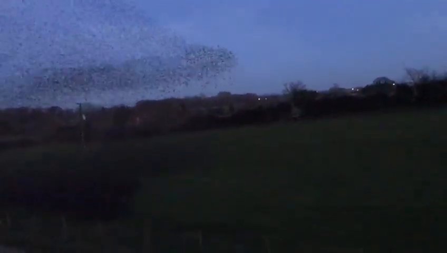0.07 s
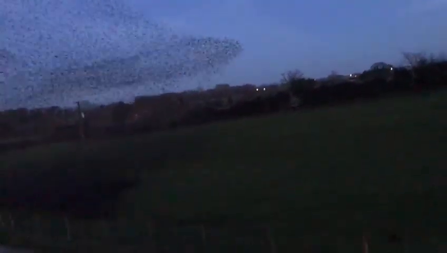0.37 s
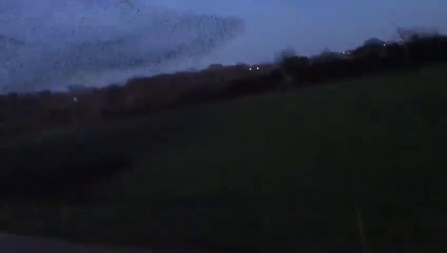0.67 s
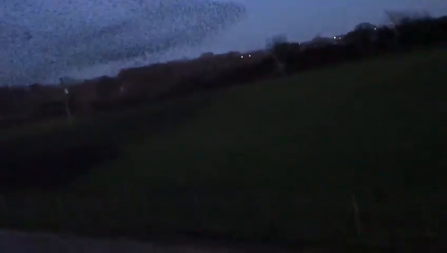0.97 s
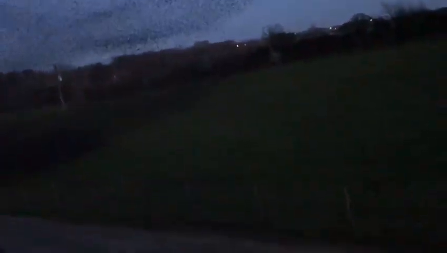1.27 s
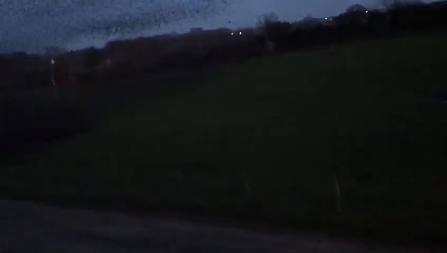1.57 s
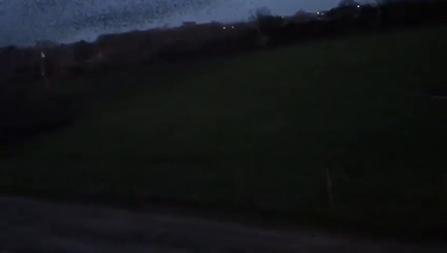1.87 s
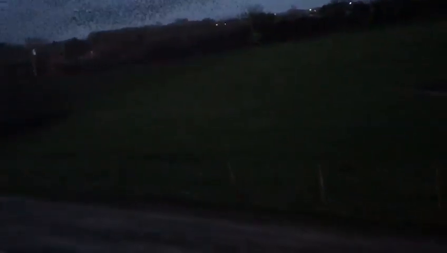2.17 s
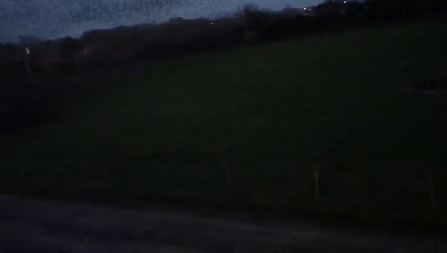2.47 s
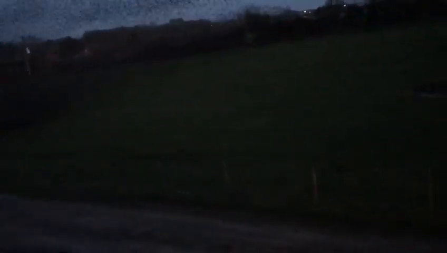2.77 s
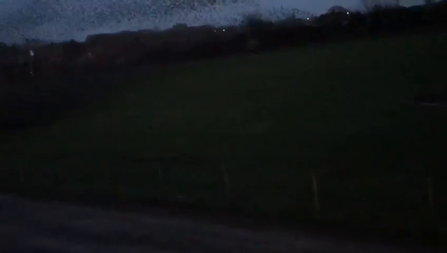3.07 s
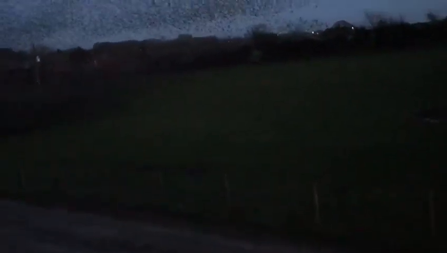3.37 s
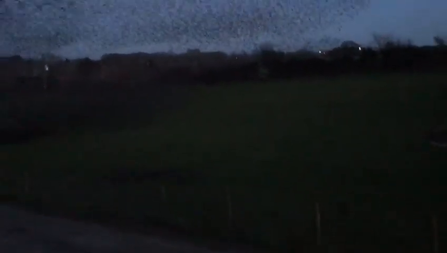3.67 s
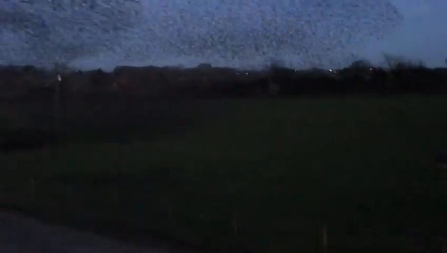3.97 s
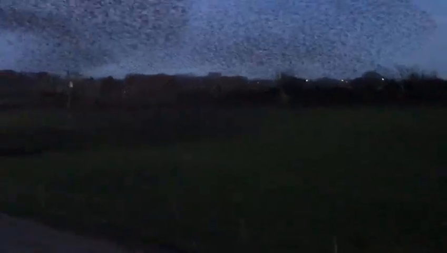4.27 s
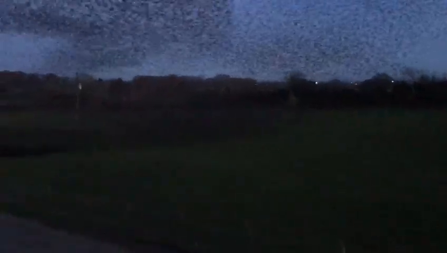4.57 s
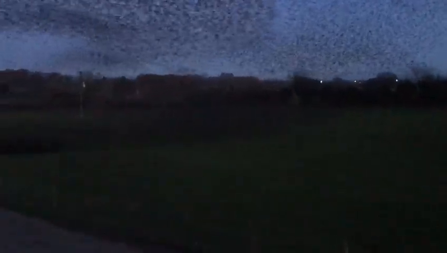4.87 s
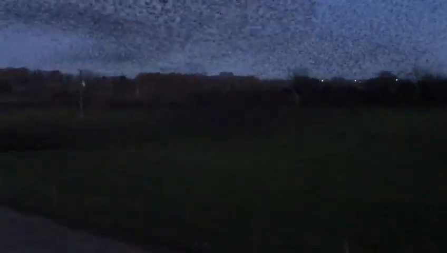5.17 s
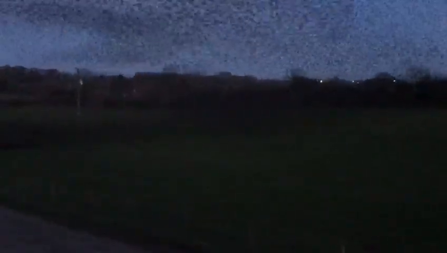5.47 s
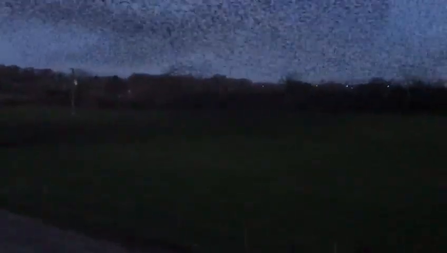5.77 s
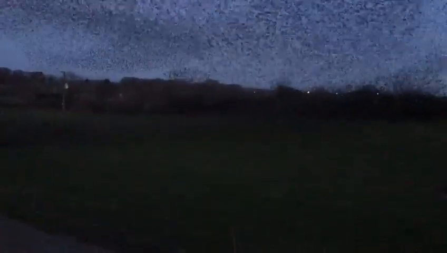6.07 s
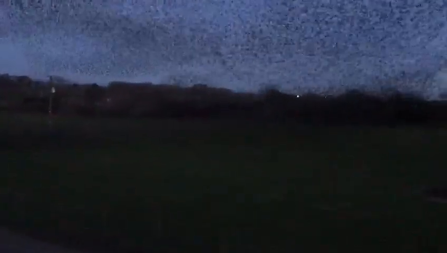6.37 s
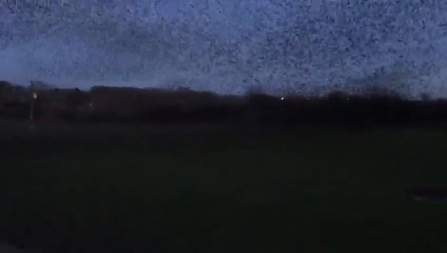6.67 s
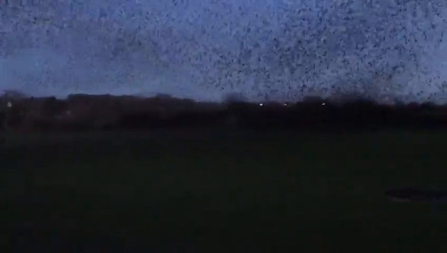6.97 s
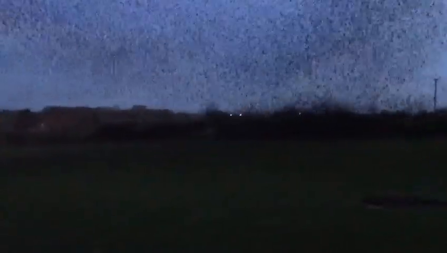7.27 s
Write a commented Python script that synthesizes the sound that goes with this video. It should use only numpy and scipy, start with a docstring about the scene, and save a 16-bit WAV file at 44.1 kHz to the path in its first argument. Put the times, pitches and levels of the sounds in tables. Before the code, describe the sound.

Thousands of starlings wheel over a field at dusk, their wingbeats merging into a soft, continuous rush. Gusts rumble and thump on the hand-held microphone, and clothing ticks and swishes briefly at the start. Midway the flock's whoosh swells as it turns, and a few thin, faint bird calls come from far off. Near the end the wind drops and the rush of wings carries on.

```python
"""From the start, thousands of wingbeats merge into a soft rush as starlings wheel over a field at dusk,
while gusts rumble on the hand-held microphone and single eddies thump across its port. In the first
second clothing ticks and a sleeve swishes. Near 3 s the flock banks and its whoosh swells; from then to
just past 4 s, thin bird calls come from far off. The hardest thumps fall near 3.8 s and 5.4 s.
After 6 s the wind drops, apart from one weak gust, and the rush of wings carries on."""
import sys
import numpy as np
from scipy import signal
from scipy.fft import rfft, irfft, next_fast_len
from scipy.io import wavfile
from scipy.ndimage import uniform_filter1d, map_coordinates

SR = 44100
rng = np.random.default_rng(int(sys.argv[2]) if len(sys.argv) > 2 else 0)


def waveform_to_disk(signal):
    """Save audio, clipped to [-1, 1], as 16-bit WAV at the path in sys.argv[1]."""
    frames = np.transpose(np.atleast_2d(signal))
    scaled = np.clip(frames, -1, 1) * 32767
    samples = np.round(scaled).astype(np.int16)
    wavfile.write(sys.argv[1], SR, samples)


N = 332073

# Spectra of pushed air, the turning flock and feathers: (frequency [Hz], relative density [dB])
RUSH_SPECTRUM = [(50, 15), (85, 16), (200, 4.5), (420, -3.5), (620, -1), (820, -4), (1080, -0.5),
                 (1350, -4), (1600, -3), (1950, -7.5), (2800, -9), (4000, -19), (8000, -43)]
WHOOSH_SPECTRUM = [(1200, -39), (1900, -5), (2350, 3.5), (2650, 2.5), (3000, -2.5), (3500, -14),
                   (5000, -66)]
FEATHER_SPECTRUM = [(1500, -33), (3000, 2.5), (4000, 4), (4900, 0.5), (5700, 0.5), (6500, 0), (7500, -4.5),
                    (9000, -5), (10400, -9), (11500, -11.5)]
# The flock drifts nearer and farther: (time [s], relative rush level [dB], relative hiss level [dB])
FLOCK_LEVELS = [(0, -52, -58.0), (0.35, -48.5, -56.5), (1.0, -50.5, -58), (1.3, -54.5, -61),
                (2.5, -54.5, -61.5), (3.3, -54, -60), (3.8, -51, -55.5), (4.25, -52.5, -59.0),
                (4.85, -50.0, -56.0), (5.55, -54.0, -62), (5.88, -52.0, -57.5), (6.1, -53.0, -60.5),
                (6.5, -51.0, -58.0), (7.15, -53, -59), (7.5, -51.5, -55)]
# The whoosh swells as the flock banks: (peak time [s], rise [s], fall [s], relative level [dB])
FLOCK_TURNS = [(.35, 0.29, .3, -65), (1.45, .33, 0.36, -57.5), (2.98, 0.87, 0.44, -50.5)]
def flock(rush_db=9.5, level_flight_db=-5.5, turn_db=0.5, feather_db=4.5):
    """Incoherent summation: countless wings add up to noise, heard as rush, whoosh and feather hiss."""
    near_db, hiss_db = curve(FLOCK_LEVELS, column=1), curve(FLOCK_LEVELS, column=2)
    rush = noise(RUSH_SPECTRUM) * wingbeats(depth=0.041) * undb(near_db + rush_db)
    whoosh_gain = np.hypot(undb(near_db + level_flight_db), undb(turn_db) * swells(FLOCK_TURNS))
    whoosh = noise(WHOOSH_SPECTRUM) * wingbeats(depth=0.07) * whoosh_gain
    feathers = noise(FEATHER_SPECTRUM) * wingbeats(depth=0.053) * undb(hiss_db + feather_db)
    return rush + whoosh + feathers


def wingbeats(depth, beat_hz=11.0, flap_s=0.89, birds=40):
    """Amplitude modulation: each near bird flaps at its own rate for a moment, then glides."""
    t = np.arange(0, N, 64) / SR
    when, pace, phase = rng.random((birds, 3)).T[:, :, None]
    strokes = np.cos(2 * np.pi * (beat_hz * (.75 + pace / 2) * t + phase))
    flapping = np.exp(-((t - when * t[-1]) / flap_s) ** 2)
    flutter = np.sum(strokes * flapping, axis=0)
    return np.exp(depth * np.interp(np.arange(N) / SR, t, flutter / flutter.std()))


# Response of the hollow in front of the microphone: (frequency [Hz], gain [dB])
PORT_RESPONSE = [(15, -3), (45, 2), (90, 2), (380, -1.5), (520, -3), (740, 3.5), (1000, 2.5), (1350, 4.5),
                 (2500, 3)]
def buffets():
    """Cavity resonance: the hollow at the microphone colours the wind's rumble and thumps."""
    wind_db = wind()
    return colour(rumble(wind_db) + eddies(wind_db), PORT_RESPONSE)


# Breeze between gusts: (time [s], relative level [dB])
BREEZE_LEVELS = [(0, -36), (1.0, -31.5), (1.3, -29), (2.0, -32.5), (2.75, -35), (2.92, -49), (3.2, -33),
                 (4.0, -32), (4.9, -34.5), (5.22, -39), (5.63, -29.5), (5.72, -40), (6.1, -37.5),
                 (6.3, -53), (6.9, -55), (7.53, -48)]
# Gusts on the microphone: (start [s], duration [s], relative level [dB])
WIND_GUSTS = [(.02, 0.036, -19.5), (0.162, 0.21, -30), (0.436, 0.096, -24), (0.581, 0.029, -19),
              (.7, 0.071, -23.5), (0.991, 0.053, -20.5), (1.088, 0.2, -17.5), (1.379, 0.065, -17),
              (1.492, 0.065, -16), (1.601, 0.072, -19), (1.776, .19, -16.5), (2.102, 0.077, -24),
              (2.248, 0.1389, -25), (2.491, 0.12, -26.5), (2.683, 0.031, -25.5), (2.777, 0.038, -30.5),
              (2.961, 0.047, -33), (3.206, 0.1248, -24), (3.418, 0.076, -17.5), (3.535, 0.042, -18),
              (3.66, 0.058, -21.5), (3.762, 0.13, -17.5), (4.048, 0.03, -18), (4.16, 0.031, -15.5),
              (4.217, .11, -20.5), (4.388, 0.04, -23.5), (4.479, 0.13, -22), (4.665, 0.039, -24),
              (4.752, 0.052, -15), (4.898, 0.1104, -16.5), (5.087, 0.037, -24.5), (5.296, 0.19, -17.5),
              (5.537, 0.073, -16.5), (5.774, .1, -27.5), (5.986, 0.084, -21), (6.982, 0.11, -29)]
def wind(gain_db=0.5, attack_s=.008, release_s=.013):
    """Addition of powers: the breeze and the brief gusts sum to one wind strength, in dB."""
    t = np.arange(N) / SR
    power = undb(curve(BREEZE_LEVELS)) ** 2
    for start, length, db in WIND_GUSTS:
        fade = np.maximum(start - t, 0) / attack_s + np.maximum(t - start - length, 0) / release_s
        power += (undb(db) * np.exp(-np.minimum(fade, 20))) ** 2
    return 10 * np.log10(power) + gain_db


# Turbulent pressure in a medium gust: (frequency [Hz], relative density [dB])
RUMBLE_SPECTRUM = [(20, -26), (30, -22), (42, 5.5), (55, 6.5), (75, 2.5), (110, -3.5), (180, -12.5),
                   (300, -27), (500, -36.5), (900, -68), (2000, -96)]
def rumble(wind_db, gain_db=-2.5, medium_db=-27, quicken=.15, churn_db=3.0, breakup=0.18):
    """Frozen turbulence: a pressure field swept past the port sounds louder and higher in faster air."""
    gust_db = wind_db + churn_db * walk(50)
    speed = np.clip(undb(quicken * (gust_db - medium_db)), .9, 1.15)
    field = noise(RUMBLE_SPECTRUM, size=2 * N)
    # the gust sets the strength, so the field's own slow swells are evened out
    field /= np.sqrt(uniform_filter1d(field ** 2, int(0.0507 * SR)))
    # strong gusts break up into single eddies and leave less even rumble
    gust_db -= breakup * np.maximum(gust_db - medium_db, 0)
    return map_coordinates(field, [np.cumsum(speed)], order=3) * undb(gust_db + gain_db)


# The hardest eddies: (time [s], relative peak level [dB], centre frequency [Hz])
HARD_EDDIES = [(0.031, -12, 165), (0.446, -9, 152), (0.495, -9.5, 192), (0.585, -6.5, 172),
               (.707, -16, 151), (.907, -15.5, 161), (1.0, -12.5, 135), (1.018, -8, 130),
               (1.154, -8.5, 176.2), (1.216, -7, 205.4), (1.235, -13, 160), (1.274, -9, 175),
               (1.389, -10.5, 222), (1.516, -13, 145), (1.605, -6.5, 129.5), (1.645, -11.5, 186),
               (1.782, -7, 204.8), (1.858, -13, 134.6), (1.9, -4.5, 119), (1.943, -9, 144.6),
               (1.983, -10.5, 125), (2.13, -6, 215), (2.585, -11.5, 197.9), (3.312, -11.5, 130.2),
               (3.435, -14, 130.4), (3.478, -3.5, 182), (3.56, -9, 89.93), (3.662, -7, 144),
               (3.691, -12, 239.2), (3.764, -6.5, 145.4), (3.78, -3, 207.1), (3.798, -10.5, 208.5),
               (3.814, -4, 147.5), (3.835, 0, 169), (3.856, -4, 208), (3.891, -9.5, 191.8),
               (4.06, -9, 123.4), (4.169, -5, 145), (4.259, -12.5, 151.5), (4.312, -4.5, 116),
               (4.758, -4.5, 161), (4.953, -4, 162), (4.974, -6, 170.9), (5.311, -12, 102.4),
               (5.376, 0, 202.3), (5.414, -5, 162), (5.457, -5.5, 222.9), (5.475, -8, 174.1),
               (5.508, -6.5, 317), (5.546, -2, 390), (5.553, -5.5, 240), (5.988, -10.5, 184.6),
               (6.053, -7.5, 110.2)]
def eddies(wind_db, gain_db=-2.0, wake_db=-8, wake_ratio=0.4, shed_db=-13, shed_ratio=1.13,
           trail_s=0.01284):
    """Vortex shedding: each eddy thumps across the port, trailed by a slow wake and two weaker eddies."""
    out, t = np.zeros(N), np.arange(-2048, 2048) / SR
    for time, db, hz in HARD_EDDIES + lesser_eddies(wind_db):
        eddy_side, wake_side, _ = rng.random(3)
        thump = vortex(t, hz, eddy_side)
        thump += undb(wake_db) * vortex(t - trail_s / 2, hz * wake_ratio, wake_side)
        for side, lag, pitch in rng.random((2, 3)):
            shed_hz = hz * shed_ratio * 2 ** (pitch - .5)
            thump += undb(shed_db) * vortex(t - trail_s * lag, shed_hz, side)
        add(out, time + t[0], undb(db + gain_db) * thump)
    return out


def lesser_eddies(wind_db, per_s=35, usual_hz=120.5, usual_db=-21, octaves_per_db=0.06,
                  over_wind_db=2.5, scatter_db=1.5, scatter_octaves=0.19):
    """Convection: stronger wind sweeps random eddies past harder and faster; rows as in HARD_EDDIES."""
    count = int(per_s * N / SR)
    at = ((np.arange(count) + rng.random(count)) * N / count).astype(int)
    strength, pitch = rng.standard_normal((count, 2)).T
    db = wind_db[at] + over_wind_db + scatter_db * strength
    hz = usual_hz * 2 ** (scatter_octaves * pitch + octaves_per_db * (wind_db[at] - usual_db))
    return list(zip(at / SR, db, hz))


def vortex(t, hz, side):
    """Pressure pulse of a vortex: one smooth swing, shaped by the side on which it passes."""
    return np.real(np.exp(2j * np.pi * side) / (1 - 1j * np.pi * hz * t) ** 3)


# Sliding nylon: (frequency [Hz], relative density [dB])
NYLON_SPECTRUM = [(1200, -3), (2300, -2), (4200, 0), (5000, -2), (7000, -0.5), (9000, 1), (11800, -2.5)]
# Rubs that make up one swish: (peak time [s], rise [s], fall [s], relative level [dB])
SLEEVE_RUBS = [(.537, 0.037, 0.019, -45.5), (.587, 0.022, 0.016, -45.5), (.702, 0.076, 0.034, -41)]
def sleeve(grain_db=1.2, weave_hz=6100, weave_db=-4):
    """Sliding friction: nylon gives a grainy hiss, and its weave sings only when it slides fast."""
    stroke = swells(SLEEVE_RUBS)
    weave_band = [(0.68 * weave_hz, -25), (weave_hz, 0), (1.24 * weave_hz, -25), (2 * weave_hz, -50)]
    weave = undb(weave_db) * noise(weave_band) * stroke / stroke.max()
    return (noise(NYLON_SPECTRUM) + weave) * stroke * undb(grain_db * walk(220))


# Ticks of clothing: (time [s], peak level [dB], centre frequency [Hz])
CREASE_TICKS = [(0.315, -32, 3000), (.428, -42, 9500), (.441, -37.5, 10500), (1.374, -43.5, 9930),
                (3.844, -34.5, 5612)]
def creases(decay_s=0.002):
    """Impulsive excitation: a crease snaps and gives a burst of noise that decays exponentially."""
    out, t = np.zeros(N), np.arange(512) / SR
    for time, db, hz in CREASE_TICKS:
        band = [(hz / 2, -14), (hz, 0), (2 * hz, -14), (4 * hz, -30)]
        snap = noise(band, size=len(t)) * np.exp(-t / decay_s)
        add(out, time, undb(db) * snap / abs(snap).max())
    return out


# Far calls: (time [s], duration [s], start frequency [Hz], end frequency [Hz], relative level [dB])
BIRD_CALLS = [(2.68, 0.018, 5994, 6810, -50), (2.927, 0.021, 5900, 6950, -51),
              (3.362, 0.054, 4455, 3972, -53), (3.431, .035, 3833, 3698, -50),
              (3.453, 0.0644, 4202, 4332, -47.5), (4.066, 0.07, 4500, 3957, -45.5),
              (4.17, 0.065, 4263, 3650, -51.5)]
def bird_calls(gain_db=-2, waver=0.0177, echo_db=-2, echo_s=0.066):
    """Frequency modulation and reverberation: thin gliding whistles, smeared by echoes from hedges."""
    direct, wobble = np.zeros(N), walk(250)
    for time, length, start_hz, end_hz, db in BIRD_CALLS:
        n = int(length * SR)
        hz = np.linspace(start_hz, end_hz, n) * (1 + waver * wobble[int(time * SR):][:n])
        envelope = undb(db + gain_db) * np.sin(np.linspace(0, np.pi, n))
        add(direct, time, envelope * np.sin(2 * np.pi * np.cumsum(hz) / SR))
    t = np.arange(SR // 2) / SR
    hedges = rng.standard_normal(len(t)) * np.exp(-t / echo_s)
    echoes = signal.fftconvolve(direct, hedges / np.linalg.norm(hedges))[:N]
    return direct + undb(echo_db) * echoes


def undb(db):
    """Amplitude ratio of a level in decibels."""
    return 10 ** (np.asarray(db) / 20)


def curve(table, column=1):
    """Linear interpolation of one table column in time."""
    rows = np.array(table)
    return np.interp(np.arange(N) / SR, rows[:, 0], rows[:, column])


def swells(table):
    """Sum of Gaussian envelopes, each with its own rise and fall."""
    t = np.arange(N) / SR
    return sum(undb(db) * np.exp(-((t - peak) / np.where(t < peak, rise, fall)) ** 2)
               for peak, rise, fall, db in table)


def colour(x, points):
    """Spectral shaping by (frequency [Hz], gain [dB]) points, rolling off below the first."""
    hz, db = np.transpose(points)
    n = next_fast_len(len(x), True)
    f = np.maximum(np.arange(n // 2 + 1) * SR / n, 1)
    gain = undb(np.interp(np.log(f), np.log(hz), db)) * np.minimum(f / hz[0], 1) ** 2
    return irfft(rfft(x, n) * gain, n)[:len(x)]


def noise(points, size=N):
    """Gaussian noise of rms 1 with the given spectral shape."""
    x = colour(rng.standard_normal(size), points)
    return x / x.std()


def walk(rate_hz):
    """Sample and hold: random steps, smoothed twice and scaled to a standard deviation of 1."""
    hold = int(SR / rate_hz)
    steps = rng.standard_normal(2048)[np.arange(N) // hold]
    x = uniform_filter1d(uniform_filter1d(steps, hold), hold)
    return x / x.std()


def add(out, time, sound):
    """Superposition of a sound on the output, from a time in seconds."""
    i = int(time * SR)
    lo, hi = max(i, 0), min(i + len(sound), N)
    out[lo:hi] += sound[lo - i:hi - i]


def scene():
    """Superposition: near wind and clothing and the birds beyond add at one microphone."""
    return (buffets() + flock() + sleeve() + creases() + bird_calls())[None]


def record(dry, cutoff_hz=12000):
    """Saturation and band limiting: the microphone rounds hard thumps; the recorder cuts the top."""
    lowpass = signal.ellip(12, .1, 80, cutoff_hz, fs=SR, output="sos")
    return signal.sosfilt(lowpass, np.tanh(dry))


dry = scene()
out = record(dry)
waveform_to_disk(out)
```